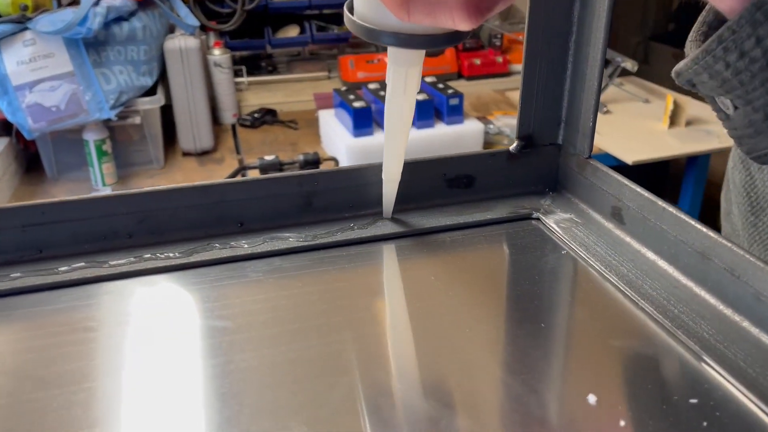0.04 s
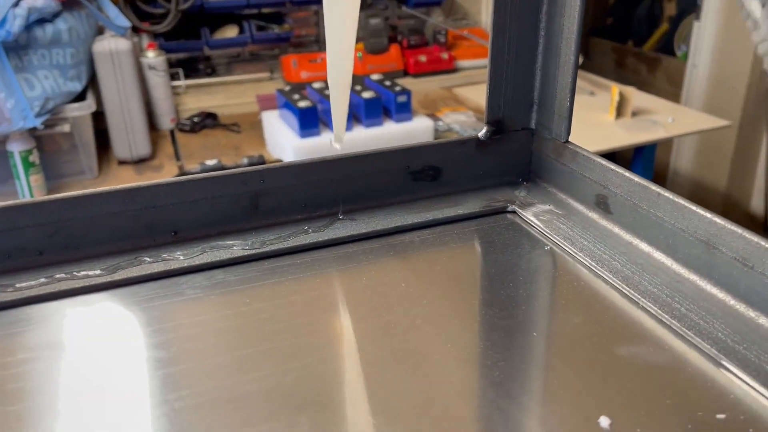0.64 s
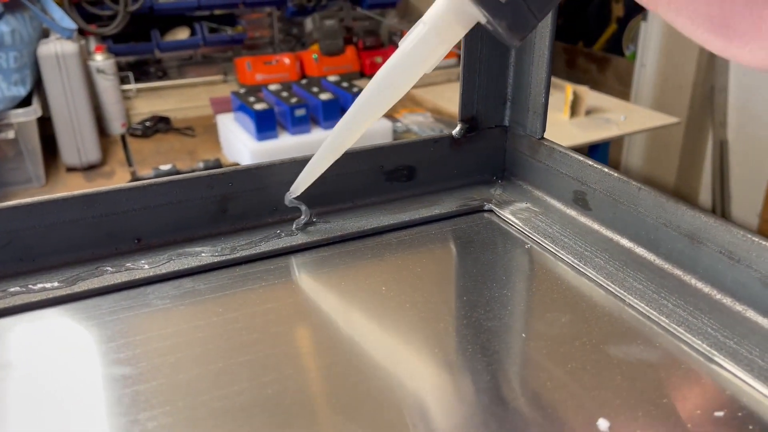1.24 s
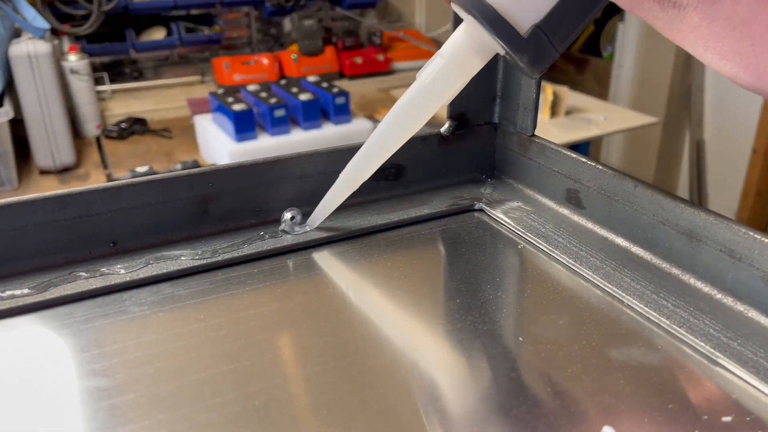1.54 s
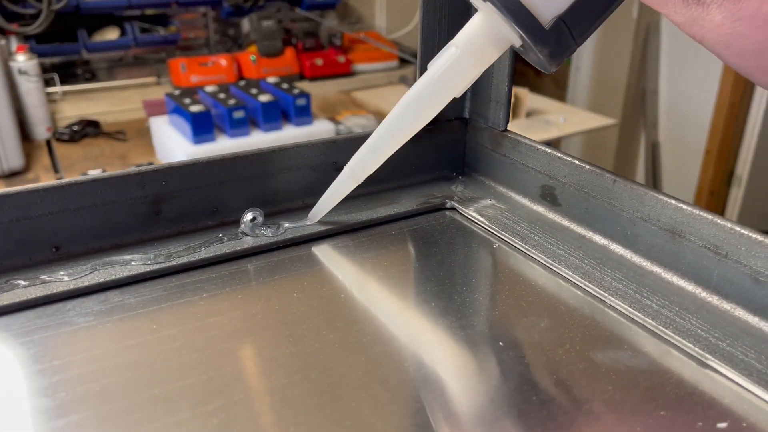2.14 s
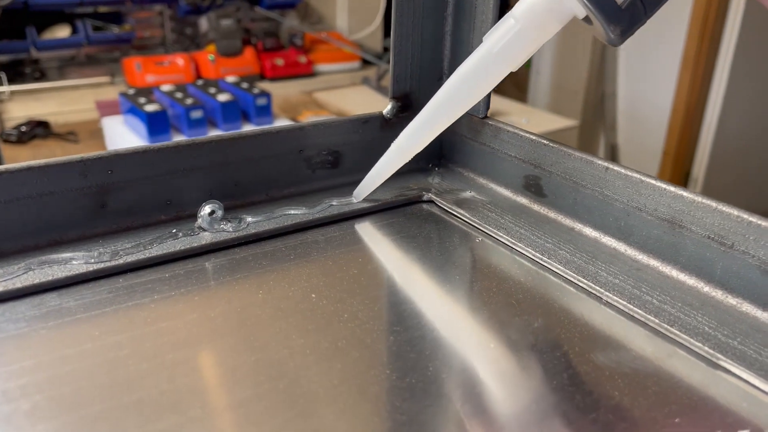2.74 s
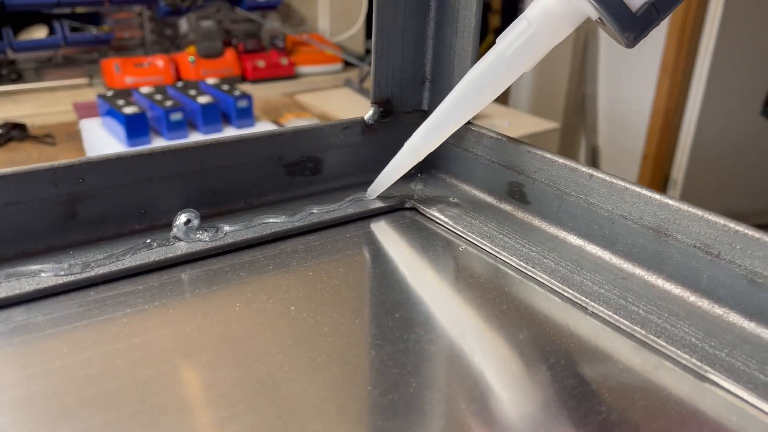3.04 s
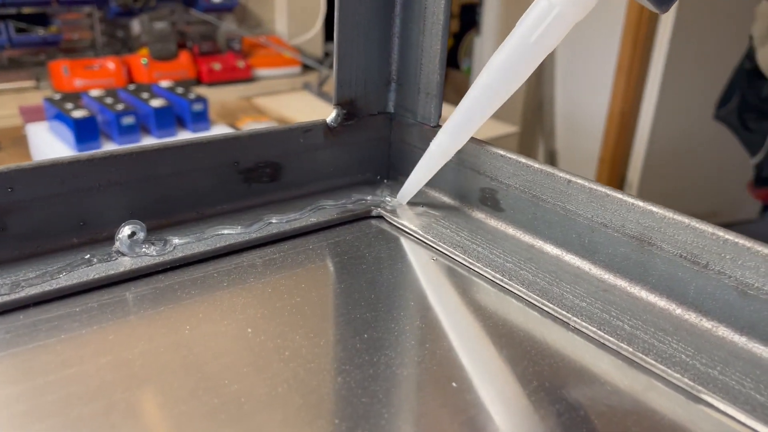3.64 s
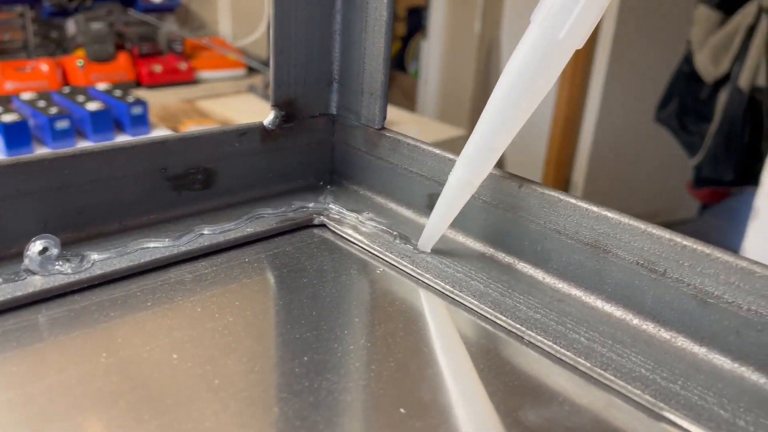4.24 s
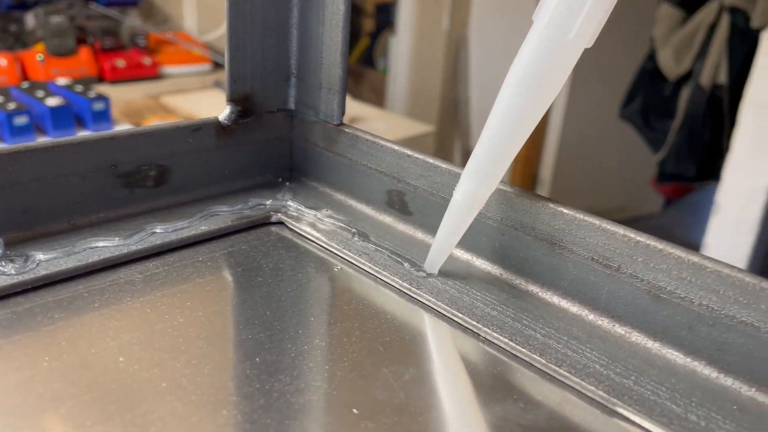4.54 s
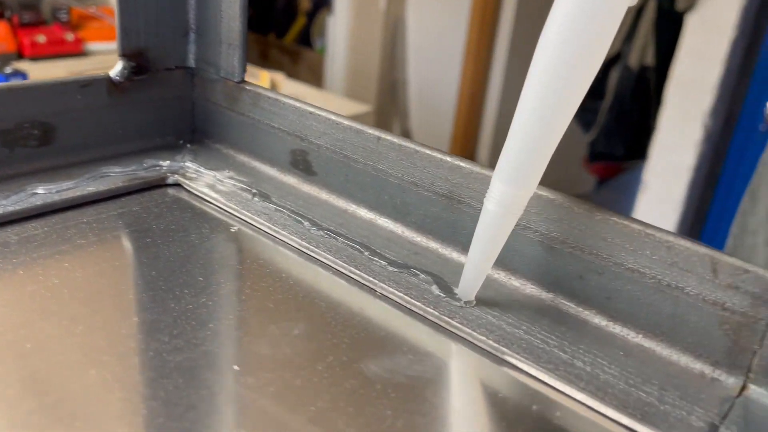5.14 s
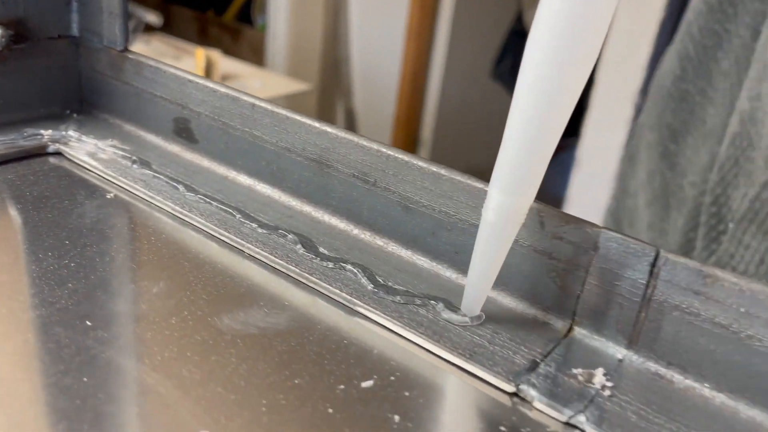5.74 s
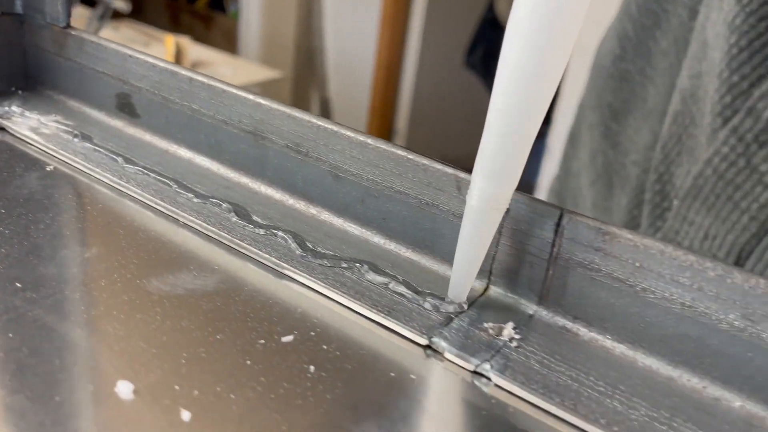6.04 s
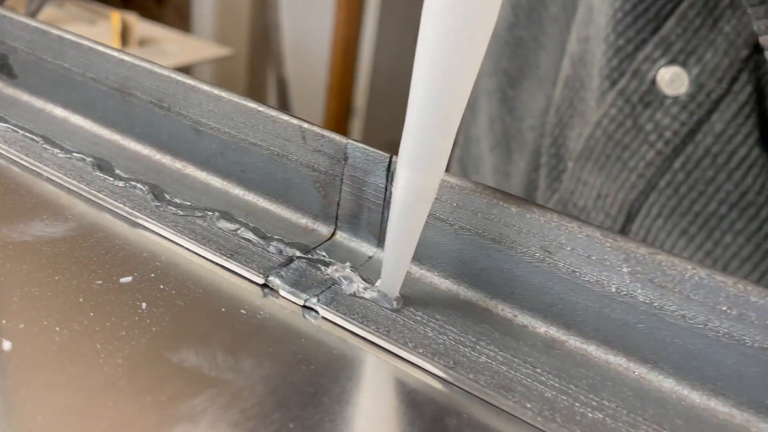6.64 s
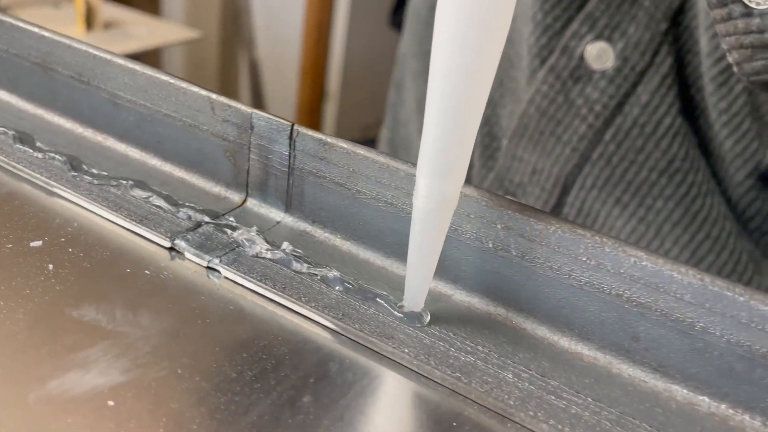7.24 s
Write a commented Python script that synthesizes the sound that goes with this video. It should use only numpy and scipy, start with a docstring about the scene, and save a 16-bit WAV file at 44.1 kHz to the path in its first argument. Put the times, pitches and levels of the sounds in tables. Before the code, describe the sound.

In a small workshop, a caulking gun's nozzle knocks and rubs on a hollow steel frame, and a sheet-metal panel gives soft, low booms. The trigger clacks a few times, then the gun settles into dry, uneven ratcheting clicks while the nozzle scrapes lightly and bumps along the steel. A steady motor hum, thin whine and ventilation rush lie behind, all heard close up in stereo.

```python
"""Small workshop: a caulking gun lays a bead of sealant along a steel frame with a sheet-metal panel.
The trigger clacks through its slack; the catch plate slips along the plunger rod in dry, uneven clicks.
The nozzle bumps, rubs and drags on the steel; the frame knocks and rumbles, the panel booms.
Behind: motor hum and whine, ventilation noise. Heard through a hand-held pair of close microphones."""
import sys
import numpy as np
from scipy import signal
from scipy.fft import rfft, irfft, next_fast_len
from scipy.io import wavfile

SR = 44100
rng = np.random.default_rng(int(sys.argv[2]) if len(sys.argv) > 2 else 0)


def put_to_file(sound):
    """Save the sound as 16-bit audio at rate SR, in the file named by the first command-line argument."""
    columns = np.atleast_2d(sound).T  # one column per channel
    safe = np.clip(columns, -1, 1)
    whole_steps = np.round(safe * 32767)
    wavfile.write(sys.argv[1], SR, whole_steps.astype(np.int16))


N = 330750

# likeness of left and right: freq_hz, correlation
CORRELATION = [(100, .99), (300, .84), (700, .18), (1500, .1), (3000, .52), (5000, .62), (8100, .96),
               (16000, .82)]
# panel drone spectrum: freq_hz, level_db
PANEL_SPECTRUM = [(90, -40), (132, -9), (146, -7), (153, 0), (160, -8), (174, -18), (210, -40)]


def from_db(db):
    """Decibels to gain."""
    return 10 ** (np.asarray(db) / 20)


def unit_rms(x):
    """Scale to rms 1."""
    return x / np.sqrt(np.mean(x ** 2) + 1e-20)


def unit_energy(x):
    """Scale to mean energy 1 per channel."""
    return unit_rms(x) / np.sqrt(x.shape[-1])


def in_time(rows):
    """Columns of a time curve, per sample."""
    time_s, *columns = np.transpose(rows)
    return [np.interp(np.arange(N) / SR, time_s, column) for column in columns]


def at_hz(points, hz):
    """Interpolate on a log-frequency axis."""
    freq_hz, value = np.transpose(points)
    return np.interp(np.log(hz + 1), np.log(freq_hz), value)


def drift(rate_hz):
    """Random wander, rms 1."""
    knots = rng.standard_normal(int(N / SR * rate_hz) + 2)
    return unit_rms(np.interp(np.linspace(0, len(knots) - 1, N), np.arange(len(knots)), knots))


def coloured(pair, spectrum):
    """Filter two independent signals; blend into partly correlated left and right."""
    size = pair.shape[-1]
    hz = np.arange(size // 2 + 1) * SR / size
    alike = np.clip(at_hz(CORRELATION, hz), -.999, .999)
    mid, side = rfft(pair) * from_db(at_hz(spectrum, hz))
    return irfft((np.sqrt(1 + alike) * mid + np.sqrt(1 - alike) * side * [[1], [-1]]) / np.sqrt(2), size)


def noise(spectrum, size=N):
    """Stereo noise from a density in dB per Hz."""
    return coloured(rng.standard_normal((2, size)), spectrum) * np.sqrt(SR / 2)


def fade(t, t60_s):
    """Exponential decay."""
    return np.exp(-np.log(1000) * t / t60_s)


def rise(t, rise_s):
    """Smooth onset, 0 to 1."""
    return 1 - np.exp(-(t / rise_s) ** 2)


def burst(spectrum, t60_s, rise_s, size=8192):
    """Dense modes struck at once, as decaying noise. Unit energy."""
    t = np.arange(size) / SR
    return unit_energy(noise(spectrum, size) * fade(t, t60_s) * rise(t, rise_s))


def ring(modes, rise_s, vary_db, detune, size=8192):
    """Struck part: damped sines, level and pitch scattered per blow. Unit energy."""
    t = np.arange(size) / SR
    hz, db, t60_s = np.transpose(modes)[:, :, None]
    strength, stretch, start_turns, spread = rng.standard_normal((4, len(modes), 1))
    phase = 2 * np.pi * (hz * (1 + detune * stretch) * t + start_turns)
    apart_rad = spread * np.sqrt(np.clip(1 - at_hz(CORRELATION, hz), 0, 2) / 2)
    envelope = from_db(db + vary_db * strength) * fade(t, t60_s)
    pair = np.array([(envelope * np.sin(phase + side * apart_rad)).sum(axis=0) for side in (1, -1)])
    return unit_energy(pair * rise(t, rise_s))


def snap(spectrum, size):
    """Minimum-phase pulse, same in both channels. Unit energy."""
    hz = np.arange(size // 2 + 1) * SR / size
    cepstrum = irfft(np.log(from_db(at_hz(spectrum, hz))), size)
    causal = 1 + np.sign(size // 2 - np.arange(size))
    pulse = irfft(np.exp(rfft(cepstrum * causal)), size)
    return unit_energy(np.tile(pulse, (2, 1)))


def add(out, start_s, sound):
    """Mix a sound in at start_s."""
    i = max(round(start_s * SR), 0)
    out[:, i:i + sound.shape[-1]] += sound[:, :N - i]


def workshop(x, wet_db=-7.5, wall_s=0.014, wall_spread_s=0.0022, size=8192):
    """Dense reflections off panel and clutter, plus a cluster off the nearest wall; treble dies first."""
    # reverb bands: freq_hz, level_db
    mids = [(450, -7), (1200, 8.5), (2700, 0), (4200, 1), (6000, -12), (16000, -14)]
    treble = [(2500, -25), (4200, 0), (6400, 0), (9000, 2), (16000, -2)]
    t = np.arange(size) / SR
    tail = noise(mids, size) * fade(t, t60_s=.15) + noise(treble, size) * fade(t, t60_s=.095)
    arrivals = rise(t, 0.001) + 0.23 * np.exp(-((t - wall_s) / wall_spread_s) ** 2)
    return x + from_db(wet_db) * signal.fftconvolve(x, unit_energy(tail * arrivals), axes=1)[:, :N]


def ventilation():
    """Steady rush of air, mostly bass."""
    # air noise: freq_hz, density_db_per_hz
    air = [(25, -76), (48, -68), (90, -65.5), (120, -72.5), (200, -82), (300, -83.5), (620, -84),
           (1500, -86.5), (1950, -84), (2250, -91.5), (2750, -87.5), (3300, -99), (4800, -99), (6500, -105),
           (8000, -106), (10500, -102.5), (13000, -116), (14200, -131), (16000, -145)]
    return noise(air)


def motor(main_hz=1090.5, speed_wander=.0006, waver_db=1.7):
    """Low hum beating against fan and mains; a thin whine whose tones follow the shaft speed."""
    # motor, fan and mains hum: freq_hz, level_db
    hum_tones = [(30.4, -58), (49.58, -41), (60.8, -50), (77.3, -61), (99.16, -41), (99.95, -53),
                 (148.74, -61)]
    # weaker whine tones: freq_hz, level_db
    low_tones = [(544, -69), (701, -69), (943, -64.5)]
    upper_tones = [(1298, -72), (2389, -72), (2561, -63.5), (2631, -69)]
    # main whine tone: time_s, left_db, right_db
    main_level = [(0, -56, -59), (.75, -59.5, -68), (1.4, -56, -59), (2, -55, -58), (2.5, -58, -60),
                  (3, -55.5, -59.5), (3.8, -59, -60.5), (5, -58, -56), (5.8, -55, -58.5), (7.5, -55, -64)]
    # microphones moving through the whine's standing waves: time_s, right_lead_rad
    phase_gap = [(0, 2.5), (.6, 2.3), (1.4, .3), (2.8, .6), (3.6, 1.2), (4.8, .4), (7.5, 1.2)]
    # weaker tones along the same path: time_s, low_db, upper_db
    swell = [(0, 5, 1), (.85, 2, -5), (1.4, -2, 6.5), (2.1, -1, -1), (2.6, 2, 2), (3.7, -2, -3),
             (5.8, -5, 2.5), (6.5, 1, -.5), (7.5, 3, -4)]
    t = np.arange(N) / SR + rng.random()
    hum = -sum(from_db(db) * np.cos(2 * np.pi * hz * t) for hz, db in hum_tones)
    gap_rad, = in_time(phase_gap)
    low_db, upper_db = in_time(swell)
    shaft_s = t + np.cumsum(speed_wander * drift(10)) / SR
    tones = [(main_hz, in_time(main_level))]
    tones += [(hz, db + low_db) for hz, db in low_tones]
    tones += [(hz, db + upper_db) for hz, db in upper_tones]
    left, right = sum(from_db(db) * np.exp(2j * np.pi * hz * shaft_s) for hz, db in tones)
    whine = np.real([left, right * np.exp(1j * gap_rad)]) * from_db(waver_db * drift(7.9))
    return np.sqrt(2) * (hum + whine)


def nozzle_drag(grains_per_s=450, spurt_db=2.4, crackle_db=2.6, judder_db=2.0, frame_gain_db=1.3):
    """The sliding nozzle hisses, crackles over grit and keeps frame and panel rumbling."""
    # scraping effort, frame rumble, panel drone: time_s, level_db
    effort = [(0.0, -56), (0.71, -76), (1.33, -68), (1.5, -65.5), (2.21, -63), (2.44, -58.5), (2.87, -56),
              (3.36, -61.5), (3.7, -59), (4.12, -59), (4.19, -63), (4.3, -57.5), (4.9, -58.5),
              (5.13, -62.5), (5.37, -63), (6.06, -61), (6.27, -69.5), (6.58, -63), (6.78, -61.5),
              (6.93, -67), (7.5, -70)]
    rumble = [(0.0, -50.5), (0.75, -56), (2.55, -53), (3.72, -54.5), (4.4, -53), (5.55, -53), (6.6, -56),
              (7.5, -57)]
    drone = [(0.0, -54), (0.65, -55), (1.0, -65), (1.52, -59), (1.79, -62.5), (2.3, -49), (2.6, -53),
             (3.15, -67), (4.2, -67), (4.89, -53.5), (6.41, -58.5), (7.5, -71)]
    # friction and frame spectra: freq_hz, level_db
    hiss_spectrum = [(500, -71), (2000, 10), (3000, 5), (4200, 10), (5300, 12.5), (6000, 8), (6800, 6),
                     (8000, 1), (9200, 5.5), (11000, 2), (13000, -13), (14200, -32), (16000, -55)]
    frame_spectrum = [(100, -40), (210, -16), (260, 1), (330, 0), (420, 0), (560, -9), (1000, -9),
                      (1400, -13), (2500, -36), (16000, -77)]
    effort_db, = in_time(effort)
    rumble_db, = in_time(rumble)
    drone_db, = in_time(drone)
    hiss_db = -61.5 + 1.17 * (effort_db - effort_db.mean())  # grows faster than the effort
    caught = rng.random(N) < grains_per_s / SR
    grit = unit_rms(rng.standard_normal((2, N)) * caught)
    friction = unit_rms(coloured(from_db(-2) * grit + rng.standard_normal((2, N)), hiss_spectrum))
    uneven_db = spurt_db * drift(25) + crackle_db * drift(260)
    frame = from_db(rumble_db + frame_gain_db + judder_db * drift(22)) * unit_rms(noise(frame_spectrum))
    panel = from_db(drone_db) * unit_rms(noise(PANEL_SPECTRUM))
    return from_db(hiss_db + uneven_db) * friction + frame + panel


def nozzle_rubs(judder_db=-0.5, panel_db=-11):
    """The nozzle judders in short rubs: the frame groans, with a little of the panel."""
    # rubs: start_s, length_s, level_db
    rubs = [(0.324, 0.17, -41), (1.447, 0.13, -46), (2.289, 0.11, -43), (4.253, 0.35, -50.5),
            (4.586, 0.18, -50), (4.81, 0.15, -45), (5.492, 0.15, -50.5)]
    # frame groan: freq_hz, level_db
    groan_spectrum = [(120, -27), (220, -4.5), (285, 3.5), (370, 0), (430, 4.5), (520, -18.5), (750, -4),
                      (1150, -14), (1400, -19.5), (2500, -17), (14000, -51)]
    t = np.arange(N) / SR
    swell = sum(from_db(db) * np.sin(np.pi * np.clip((t - start_s) / length_s, 0, 1)) ** 2
                for start_s, length_s, db in rubs)
    groan = unit_rms(noise(groan_spectrum)) * from_db(judder_db * drift(60))
    panel = from_db(panel_db) * unit_rms(noise(PANEL_SPECTRUM))
    return swell * (groan + panel)


def panel_flexes(gain_db=32.5):
    """The gun's weight lands on the frame; the wide panel flexes and booms."""
    # booms, short where the nozzle stays pressed on: start_s, level_db, t60_s
    flexes = [(.21, -43, .15), (.42, -41, .3), (1.266, -29.5, .11), (1.41, -41, .5), (1.94, -33.5, .4)]
    # panel modes: freq_hz, level_db, t60_share
    panel_modes = [(138, -8, .7), (151, 0, 1), (172, -12, .7)]
    out = np.zeros((2, N))
    for start_s, level_db, t60_s in flexes:
        modes = [(hz, db, share * t60_s) for hz, db, share in panel_modes]
        boom = ring(modes, rise_s=0.022, vary_db=0, detune=0.008, size=32768)
        add(out, start_s, from_db(level_db + gain_db) * boom)
    return out


def nozzle_bumps(knock_gain_db=26, clack_gain_db=28.5, thud_db=-3.0):
    """A bump clacks at the contact and knocks in the hollow frame; harder contact reaches higher modes."""
    # bumps: start_s, knock_db, pitch_hz, clack_db
    bumps = [(0.205, -36.5, 337, -35), (0.216, -35.5, 266, -47), (1.268, -38, 324, -53),
             (1.3, -37.5, 280, -48), (1.426, -40.5, 340, -68), (1.7, -44.5, 350, -43.5),
             (1.931, -42, 388, -46), (1.961, -44, 276, -69), (2.271, -35, 360, -60),
             (2.351, -39.5, 417, -47.5), (2.526, -31, 420, -50), (4.307, -43.5, 324, -65),
             (4.668, -43.5, 328, -63), (4.884, -43, 340, -61), (4.914, -43, 330, -47.5),
             (4.964, -41, 286, -62), (5.237, -35, 343, -49), (5.3215, -63, 410, -44.5),
             (5.589, -39, 285, -64), (6.145, -41.5, 300, -62)]
    # frame modes: freq_hz, level_db, t60_s
    frame_modes = [(267.3, 0.5, 0.2), (336.6, 2.5, .1), (390, 1.5, .11), (450, -3.5, 0.23),
                   (523, -1.5, .08), (685, 3, 0.24), (1770, 5, .1)]
    # knock spectrum: pitch_ratio, level_db
    knock_spectrum = [(.3, -25), (.62, -14.5), (1, 3), (1.3, -1), (1.6, -6.5), (1.85, -5), (2.3, -29),
                      (3.2, -16), (6, -22.5), (40, -37)]
    # contact clack: freq_hz, level_db
    clack_spectrum = [(300, 11.5), (520, -15), (720, 20.5), (900, -1.5), (1250, 11), (1650, 2), (2000, 1),
                      (2400, 1.5), (3400, 4.5), (4300, -9), (6500, -13), (16000, -30)]
    out = np.zeros((2, N))
    for start_s, knock_db, pitch_hz, clack_db in bumps:
        contact = [(ratio * pitch_hz, db) for ratio, db in knock_spectrum]
        modes = [(hz, db + at_hz(contact, hz), t60_s) for hz, db, t60_s in frame_modes]
        frame = ring(modes, rise_s=0.0015, vary_db=1.5, detune=0.006)
        thud = from_db(thud_db) * burst(contact, t60_s=0.21, rise_s=0.0021)
        clack = burst(clack_spectrum, t60_s=0.037, rise_s=0.00054)
        add(out, start_s, from_db(knock_db + knock_gain_db) * (frame + thud))
        add(out, start_s, from_db(clack_db + clack_gain_db) * clack)
    return out


def trigger(gain_db=12.5, rattle_db=5.0):
    """The loose trigger clacks against its pivot, duller than the catch plate."""
    # slack taken up: start_s, level_db
    clacks = [(1.2657, -25), (1.294, -34), (1.4285, -32), (1.709, -34.5), (1.754, -37.5), (1.8363, -38.5)]
    # lever modes: freq_hz, level_db, t60_s
    lever_modes = [(2400, 6.5, 0.015), (3480, 3, 0.017), (4640, -1, 0.014), (6020, 5.5, 0.011)]
    # pivot rattle: freq_hz, level_db
    rattle_spectrum = [(300, 8), (2000, 3.5), (6300, 4.5), (7500, -1), (11000, -7.5), (16000, -32)]
    out = np.zeros((2, N))
    for start_s, level_db in clacks:
        lever = ring(lever_modes, rise_s=.0006, vary_db=1, detune=.01)
        rattle = from_db(rattle_db) * burst(rattle_spectrum, t60_s=0.047, rise_s=0.00031)
        add(out, start_s, from_db(level_db + gain_db) * (lever + rattle))
    return out


def slip(tick_db, body_db, plate_db, tilt_db_per_oct, edge_db,
         edge_hz=11500, tilt_centre_hz=3400, skid_s=.0006, size=2048):
    """One slip snaps, rings the steel catch plate and shakes the gun's cradle and cartridge."""
    # tick, snap and body rattle spectra: freq_hz, level_db
    tick_spectrum = [(1000, -5.5), (5500, -12), (6400, -1.5), (8000, 1), (9600, -6), (11000, 4.5),
                     (12200, -8), (14000, -10), (15500, -15), (16500, -26)]
    snap_spectrum = [(500, -20), (1000, -5.5), (2000, 2), (3000, -9.5), (5500, 1), (8000, 10), (12000, -10),
                     (14000, -3), (15500, -11), (16500, -12)]
    body_spectrum = [(300, -5.5), (900, -8.5), (1900, -15.5), (2800, 0), (5000, -5), (6000, -10),
                     (9000, -6), (16000, -77)]
    # catch plate and cradle modes: freq_hz, level_db, t60_s
    plate_modes = [(6200, 2, 0.01), (6470, 5.5, 0.0086), (7110, -1, 0.013), (10860, 1, 0.0046),
                   (11400, -2, 0.0026)]
    cradle_modes = [(2680, 2.5, 0.0061), (2843, 0.5, 0.0083), (3220, 0, 0.0041), (3860, -2, 0.0071),
                    (4150, -1, 0.0071), (4670, -4, 0.0069)]
    tick = [(hz, db + edge_db * (hz > edge_hz)) for hz, db in tick_spectrum]
    tilted = [(hz, db + tilt_db_per_oct * np.log2(hz / tilt_centre_hz), t60_s)
              for hz, db, t60_s in cradle_modes]
    crack = from_db(9.5) * burst(tick, t60_s=0.011, rise_s=0.0001, size=size)
    crack += from_db(6.5) * snap(snap_spectrum, size)
    chatter = from_db(3.0) * burst(snap_spectrum, t60_s=0.026, rise_s=0.0015, size=size)
    plate = from_db(plate_db + 10) * ring(plate_modes, rise_s=0.0011, vary_db=1, detune=0.013, size=size)
    cradle = from_db(18) * ring(tilted, rise_s=0.0007, vary_db=0.5, detune=0.01, size=size)
    rattle = from_db(21.5) * burst(body_spectrum, t60_s=0.02, rise_s=0.0021, size=size)
    # the plate skids before it bites the rod again
    bite = np.pad(crack, [(0, 0), (round(skid_s * SR), 0)])[:, :size]
    return from_db(tick_db) * (chatter + plate + bite) + from_db(body_db) * (cradle + rattle)


def ratchet(firm_slip_db=-25, body_db_per_db=0.67):
    """The catch plate slips along the rod; trigger load shares each blow between plate and body."""
    # slips: start_s, tick_db; the faint row at 2.389 s repeats the slip just before it
    slips = [(0.057, -34.5), (1.9608, -22.5), (2.3089, -22), (2.378, -22), (2.389, -37), (2.536, -33),
             (2.5691, -25), (2.6024, -23.5), (2.617, -34), (2.632, -31), (2.6556, -27), (2.6981, -23.5),
             (2.7208, -28), (2.734, -43), (2.784, -34), (2.8863, -19.5), (2.924, -31.5), (3.0007, -23.5),
             (3.0396, -26.5), (3.0934, -25.5), (3.1168, -32), (3.1327, -38), (3.15, -35), (3.163, -41),
             (3.244, -21), (3.472, -19), (3.5389, -24.5), (3.574, -29.5), (3.633, -26), (3.6573, -34.5),
             (3.791, -21), (3.828, -31), (3.859, -38), (3.9404, -24.5), (3.9867, -27), (4.0388, -31),
             (4.069, -36.5), (4.301, -25), (4.49, -28.5), (4.6417, -28), (4.719, -35.5), (4.7717, -29.5),
             (4.811, -36), (4.87, -27.5), (4.908, -36), (5.2294, -22.5), (5.2732, -32.5), (5.4041, -27),
             (5.4891, -29), (5.526, -37.5), (5.5603, -37.5), (5.629, -31), (5.8027, -25), (5.9849, -26.5),
             (6.0649, -29), (6.146, -41), (6.237, -37.5), (6.4816, -23.5), (6.535, -38), (6.7173, -25),
             (6.8974, -25.5), (7.1119, -24.5), (7.198, -29.5), (7.218, -56), (7.245, -49), (7.276, -43),
             (7.299, -48), (7.362, -31.5), (7.3824, -47), (7.427, -41.5), (7.449, -49)]
    # response under trigger load: time_s, firm_body_db, plate_db, tilt_db_per_oct, edge_db
    load_response = [(0, -42, -0.5, 3, -4), (3.1, -40, -0.5, 5, -2), (3.5, -36.5, -11, 17, 2),
                     (5.3, -32, -3, -6.5, 1), (6.2, -32.5, -1, -9, 8), (6.9, -34.5, 2.5, -10, 5),
                     (7.4, -33, 8.5, -14, -1)]
    out = np.zeros((2, N))
    firm_body_db, plate_db, tilt_db_per_oct, edge_db = in_time(load_response)
    for start_s, tick_db in slips:
        i = round(start_s * SR)
        body_db = firm_body_db[i] + body_db_per_db * (tick_db - firm_slip_db)
        add(out, start_s, slip(tick_db, body_db, plate_db[i], tilt_db_per_oct[i], edge_db[i]))
    return out


def scene():
    """Gun and steel close by, with reflections, over motor and ventilation."""
    work = trigger() + ratchet() + nozzle_bumps() + panel_flexes() + nozzle_rubs() + nozzle_drag()
    return workshop(work) + motor() + ventilation()


def record(dry, cutoff_hz=16300):
    """Two microphone ports, slightly unequal in level, out of phase in the treble; then a low-pass."""
    # left port over right: freq_hz, level_db
    balance = [(100, 0), (330, -1), (700, 0.3), (1400, 1.2), (2800, 2.4), (5600, 1.8), (9000, -0.2)]
    # left port lead: freq_hz, phase_rad
    lead = [(200, 0), (2500, .3), (5200, .6), (6500, -.8), (8100, -3.1), (9500, -4.4), (11600, -6.3),
            (12600, -7.1), (14500, -9.3), (16000, -9.6)]
    size = next_fast_len(N + 2048)
    hz = np.arange(size // 2 + 1) * SR / size
    half = np.array([[.5], [-.5]])
    response = from_db(half * at_hz(balance, hz)) * np.exp(1j * half * at_hz(lead, hz))
    ports = irfft(rfft(dry, size) * response, size)[:, :N]
    return signal.sosfilt(signal.ellip(10, .2, 80, cutoff_hz, fs=SR, output="sos"), ports)


dry = scene()
out = record(dry)
put_to_file(out)
```